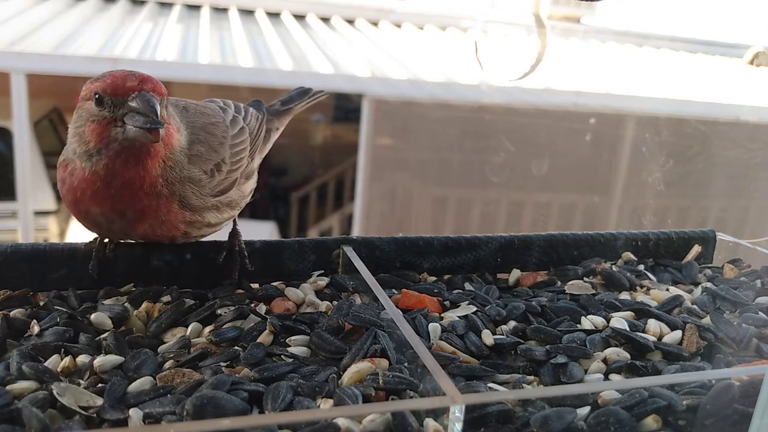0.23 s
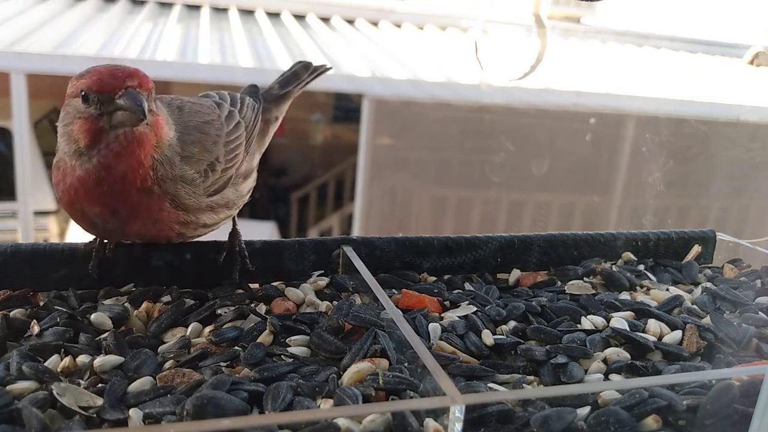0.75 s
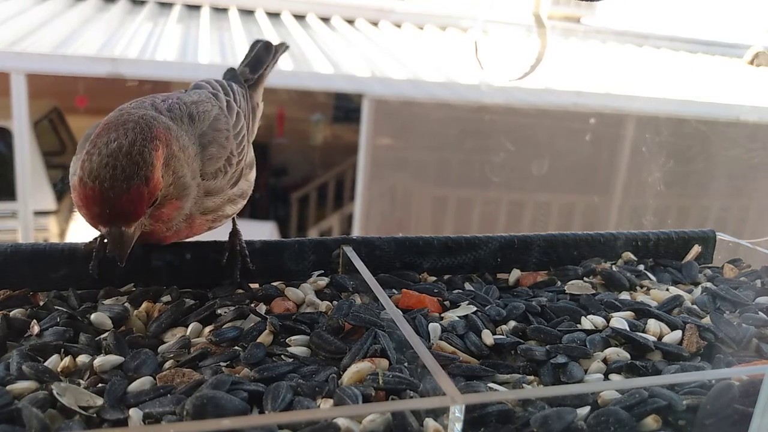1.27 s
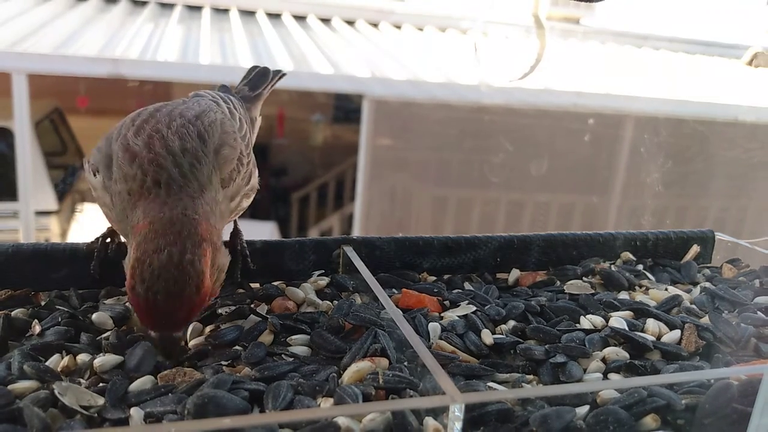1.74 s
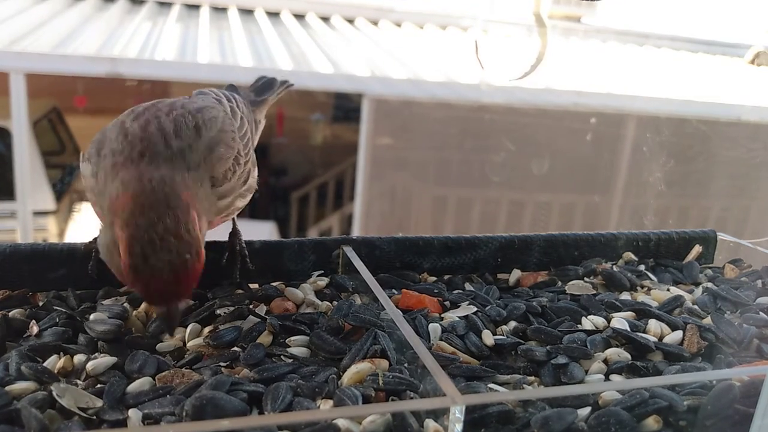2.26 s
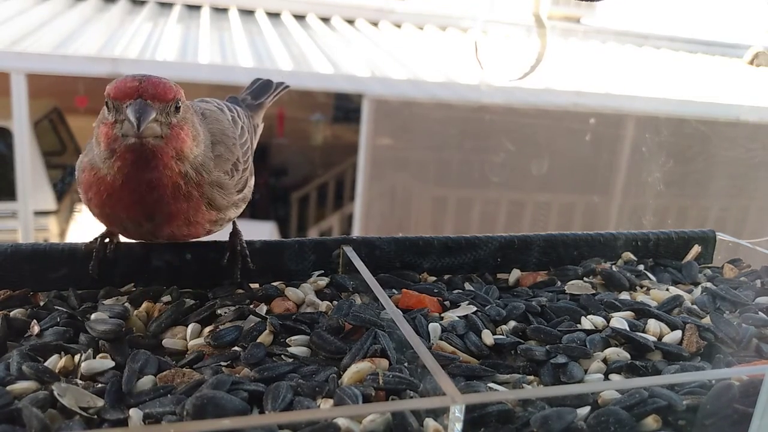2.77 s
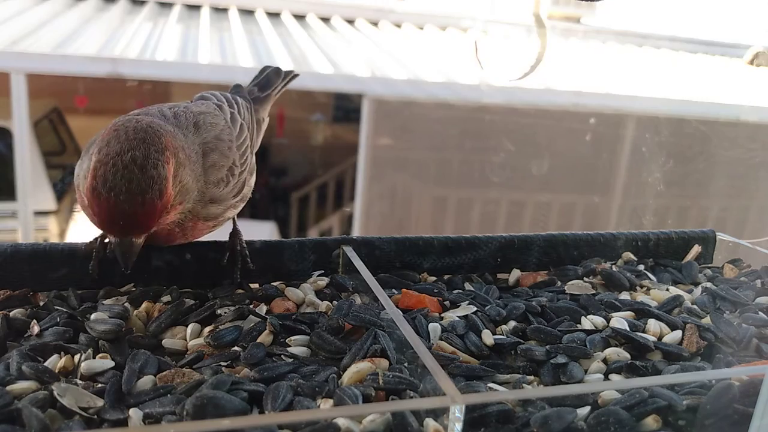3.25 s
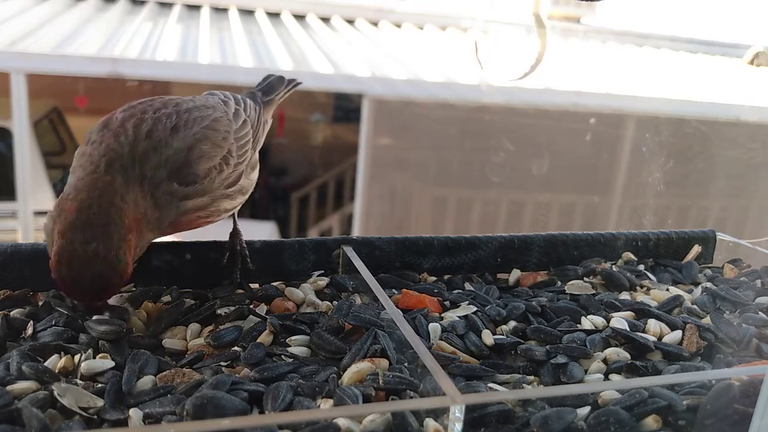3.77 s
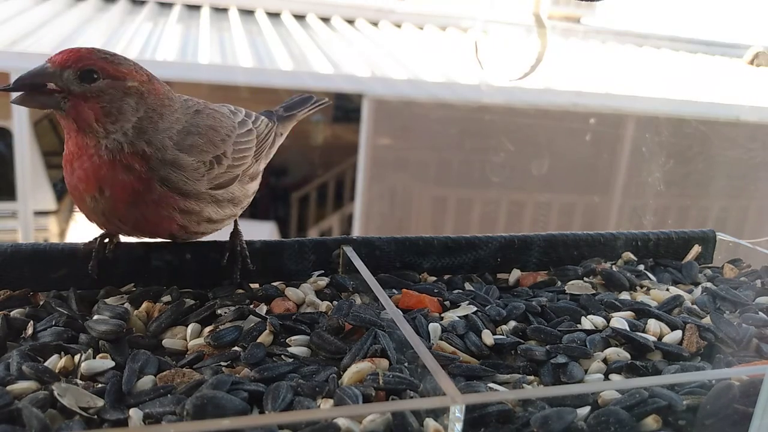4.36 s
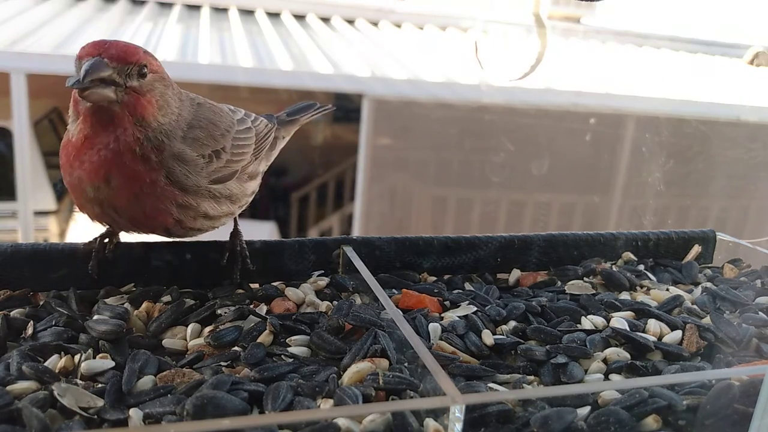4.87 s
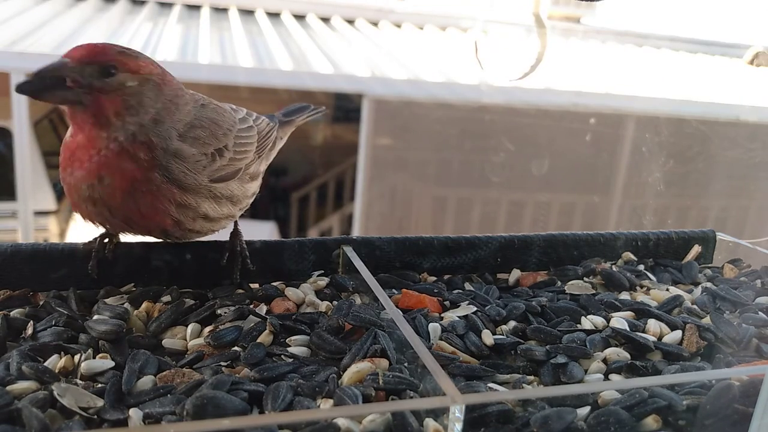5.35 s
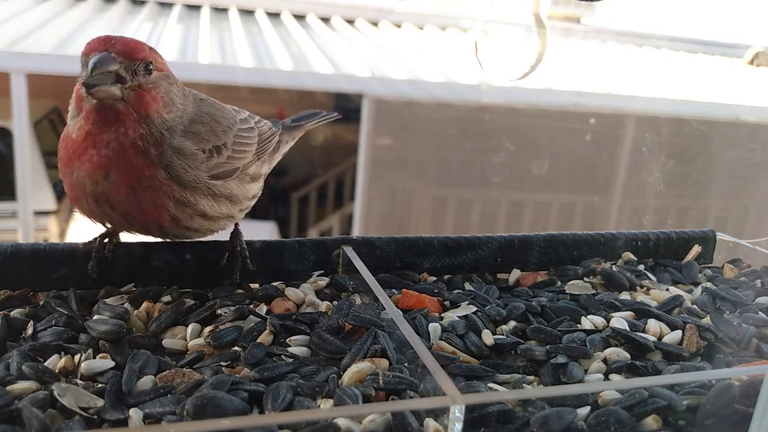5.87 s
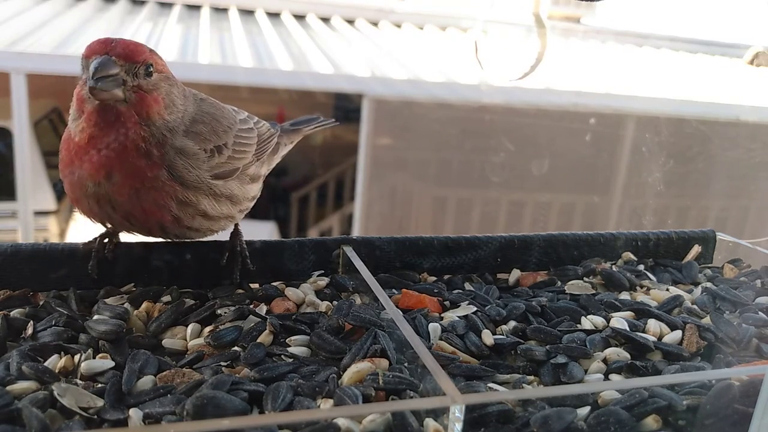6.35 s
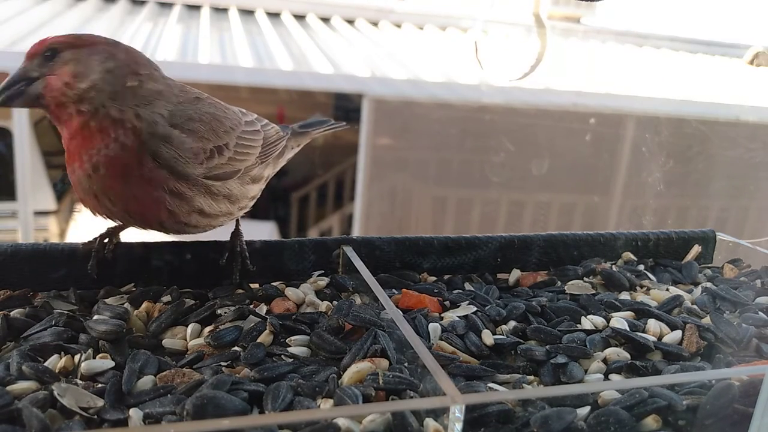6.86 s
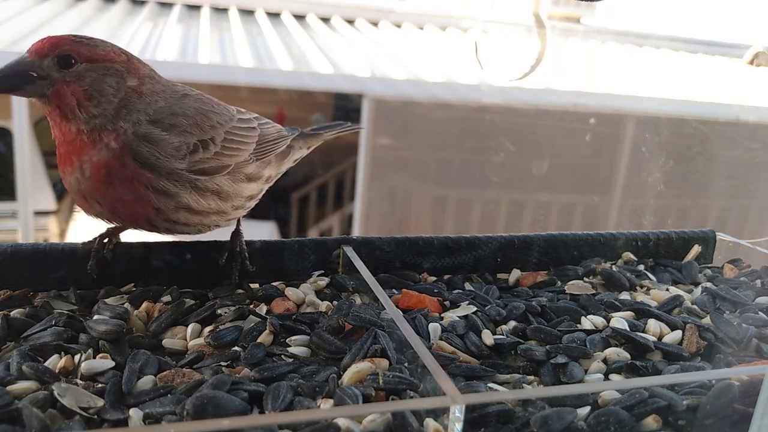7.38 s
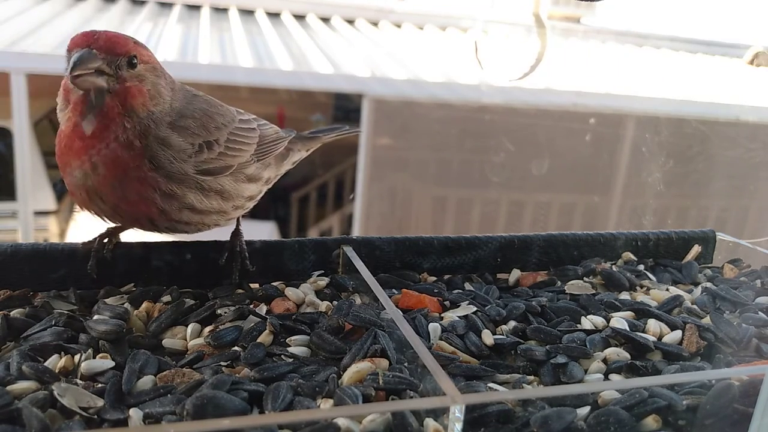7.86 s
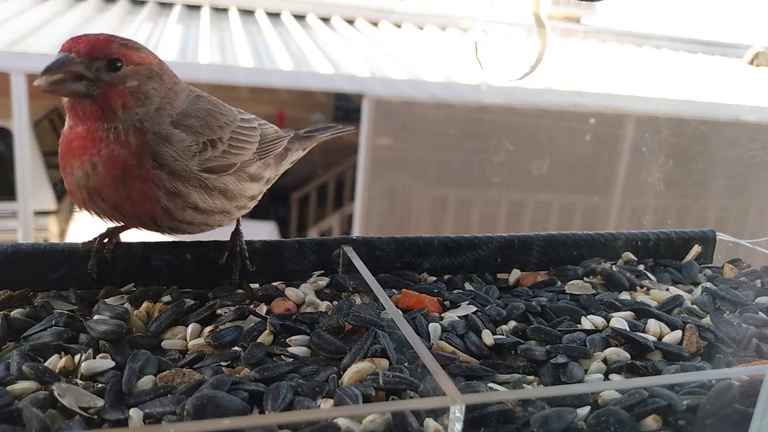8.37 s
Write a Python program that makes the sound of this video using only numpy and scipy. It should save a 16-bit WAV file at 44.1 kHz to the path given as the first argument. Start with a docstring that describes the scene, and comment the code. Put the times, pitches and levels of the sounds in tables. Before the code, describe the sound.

A steady, soft low rumble of far traffic with light hiss lasts all 8.6 seconds, slightly fuller midway, with thin wavering hums buried in it. Distant sparrow cheeps and short gliding whistles around 3 to 5 kHz come and go, blurred and echoed by house walls, a clearer one at 1.3. Up close and dry, a few faint ticks occur in the first second. At 1.75 a peck knocks the plastic tray and rustles seeds; small taps follow at 2.4 and 2.7, then a quieter spell until a knock at 3.8. From 4.1 light husk clicks patter. A very sharp bright crack snaps at 4.7, a moderate one at 5.75, then a dense loud cluster at 6.2 to 6.4, with single snaps at 6.9 and 7.13. Fine crumbling continues, a soft low thud comes at 7.8, and weak clicks at 8.0 and 8.4.

```python
"""On a plastic tray feeder among house walls, a finch husks seeds close to a small microphone.
Husks crack as short bursts that ring seed tones; knocks ring the tray; stirred seeds rustle
as showers of tiny clicks. Far birds whistle on gliding pitches, smeared by the walls, over
town rumble made of coloured noise, with two thin wavering hums."""
import sys
import numpy as np
from scipy import signal
from scipy.fft import rfft, irfft, next_fast_len
from scipy.io import wavfile

SR = 44100
rng = np.random.default_rng(int(sys.argv[2]) if len(sys.argv) > 2 else 0)


def transcribe(signal):
    """Save signal, clipped to [-1, 1], as a 16-bit WAV file at the path in sys.argv[1]."""
    frames = np.atleast_2d(signal).T
    limited = np.clip(frames, -1, 1)
    pcm = np.round(limited * 32767).astype(np.int16)
    wavfile.write(sys.argv[1], SR, pcm)


N = 380141
TIME = np.arange(N) / SR

# husk cracks and seed clicks that stand out; brightness is upper against lower drive energy:
# start_s [s], level_db [dB, relative], brightness_db [dB]
HUSK_CRACKS = [(0.3765, -34, -15), (0.3862, -37, -11), (0.6586, -27.5, 4.5), (0.906, -50, -8),
               (1.7543, -30.5, -26), (1.8009, -44, -1), (1.8405, -45, -4), (1.8817, -44, -8),
               (1.9309, -41, -6), (2.0168, -35, -8), (2.0337, -33.5, -4), (2.4863, -42, 0.0),
               (2.6946, -36, 3), (2.698, -27, -3), (3.834, -36, -2), (3.8841, -40.5, -8), (4.0959, -35, -6),
               (4.1015, -32.5, -8), (4.115, -34, -4), (4.202, -31, -7), (4.2253, -41, -6),
               (4.2665, -33, -5), (4.4937, -43, -5), (4.549, -43.5, 4), (4.708, -4.5, 10),
               (4.792, -33.5, 6.5), (4.8192, -37, -2), (4.8883, -43, -3), (5.1023, -43, -6),
               (5.1225, -42, -1), (5.175, -43, -2), (5.188, -39, -7), (5.261, -42, -5), (5.3258, -44, -3),
               (5.336, -44, -5), (5.3995, -33, -6), (5.4049, -34, -10), (5.464, -42, -4), (5.493, -36.5, 3),
               (5.5523, -44, -6), (5.635, -41, 18), (5.7159, -37, -1), (5.7579, -20, 3), (5.8563, -33, -7),
               (5.8652, -23, 1), (5.929, -40.5, -16), (5.9826, -39.5, 14), (6.1573, -36, -5),
               (6.184, -13, 12), (6.1883, -16.5, -2), (6.2144, -34, 15), (6.2178, -5, 14), (6.2272, -7, 15),
               (6.241, -39, -8), (6.311, -41, -3), (6.3226, -20.5, 10), (6.3477, -16, 4), (6.355, -14, 9),
               (6.3857, -39, 5), (6.4055, -31, 3), (6.4468, -33.5, -4), (6.5149, -40, 14),
               (6.562, -40.5, 7), (6.6876, -39.5, 4), (6.7723, -35.5, 9), (6.7792, -32.5, 4),
               (6.8808, -15, 4), (6.9368, -35.5, -4), (7.1348, -10.5, 4.5), (7.1417, -23, -4),
               (7.1957, -38.5, -10), (7.2519, -30.5, -2.5), (7.472, -42, 2), (7.5283, -43, 2),
               (7.5856, -42, 2), (7.9929, -26.5, -1.5), (8.4013, -36, 7)]
# tones a cracked seed rings with, and the time each takes to fall 60 dB:
# pitch_hz [Hz], level_db [dB, relative], t60_s [s]
SEED_TONES = [(3390, -18, 0.004), (4460, -6.5, 0.0057), (5126, 0.0, 0.0016), (6394, -2.5, 0.0034),
              (7920, -2, 0.0045), (8870, -7, 0.0032), (9850, -5.5, 0.0046), (12200, 0.0, 0.0025),
              (14970, -5.5, 0.0035), (16440, -18, 0.0013)]
SNAP_DB, CRUMBLE_S_PER_DB = -32, .00005   # cracks fainter than this crumble longer
TRAY_ANSWER_DB = -31   # base level of the tray's answer, before each crack's own level and dullness
HUSK_LOW_HZ = 2300   # cracks carry little sound below this


def cracks():
    """Bright cracks drive the upper seed tones, dull ones the lower; the tray answers faintly."""
    start_s, level_db, bright_db = np.transpose(HUSK_CRACKS)
    upper_share = 1 / (1 + amp(-2 * bright_db))[:, None]
    is_upper = np.array(SEED_TONES)[:, 0] > 9300
    energy_share = np.where(is_upper, upper_share, 1 - upper_share)
    contact_s = np.maximum(SNAP_DB - level_db, 0)[:, None] * CRUMBLE_S_PER_DB
    seed_gains = amp(level_db)[:, None] * np.sqrt(energy_share)
    husk = strike(start_s - .0004, seed_gains, SEED_TONES, contact_s, spread_db=1.5)
    # dull and soft cracks pass on a larger share to the tray; its lowest tone stays out
    tray_db = .6 * level_db + TRAY_ANSWER_DB - .5 * bright_db
    tray_gains = amp(tray_db)[:, None] * np.ones(3)
    tray = strike(start_s, tray_gains, TRAY_TONES[1:], 0, spread_db=2.5)
    high_pass = signal.butter(2, HUSK_LOW_HZ, "high", fs=SR, output="sos")
    husk = signal.sosfilt(high_pass, husk)
    near = husk + 1.2 * later(husk, .00057)   # the bounce off the tray
    treble = np.diff(husk, prepend=0)   # near walls return mostly treble
    return near + tray + amp(-14) * scatter(treble, t60=.035, delay_s=.001)


# knocks carried through the tray, long ones are scrabbling clusters:
# start_s [s], level_db [dB, relative], contact_s [s], lowest_tone_db [dB, added to the lowest tray tone]
TRAY_KNOCKS = [(1.741, -30, .022, -4), (1.7534, -20, 0.012, -4), (1.799, -34, 0.014, -3),
               (1.845, -40, .022, -6), (2.386, -31, 0.022, -4), (2.694, -27, .008, -5),
               (3.82, -29, 0.02, -4), (7.1416, -33, 0, 16)]
# tones of the plastic tray: pitch_hz [Hz], level_db [dB, relative], t60_s [s, time to fall 60 dB]
TRAY_TONES = [(1754, -6.5, 0.033), (2310, -8, 0.013), (2820, -13.5, 0.014), (3750, -12, .008)]
THUD_S, THUD_HZ, THUD_DB, THUD_LENGTH_S = 7.77, 61.5, -21, .045   # one low bump through the feeder


def knocks():
    """Blows ring the tray and the seeds lying on it; one soft low thud is a brief swelling sine."""
    start_s, level_db, contact_s, lowest_db = np.transpose(TRAY_KNOCKS)
    lying_seeds = [(hz, db - 6, t60) for hz, db, t60 in SEED_TONES[:4]]
    tones = list(TRAY_TONES) + lying_seeds
    is_lowest = np.arange(len(tones)) == 0
    gains = amp(level_db[:, None] + np.outer(lowest_db, is_lowest))
    tray = strike(start_s, gains, tones, contact_s[:, None], spread_db=2.5)
    t = np.clip(TIME - THUD_S, 0, THUD_LENGTH_S)
    swell = np.sin(np.pi * t / THUD_LENGTH_S)
    return tray - amp(THUD_DB) * swell * np.sin(2 * np.pi * THUD_HZ * t)


# beak and feet stirring seeds: start_s [s], length_s [s], level_db [dB, relative]
SEED_STIRS = [(0.572, 0.073, -60.5), (1.249, 0.063, -63), (1.734, 0.054, -47.5), (2.378, .03, -57.5),
              (2.955, 0.054, -62), (3.065, 0.13, -66), (7.428, 0.055, -59)]
# loudness curve of crumbs nibbled and seeds tumbling between cracks: time_s [s], level_db [dB, relative]
CRUMB_LEVELS = [(1.7, -85), (1.82, -66), (2.6, -78), (3.7, -90), (3.95, -67), (5.0, -77), (5.35, -68),
                (6.5, -63), (8.1, -69)]


def rustle():
    """Stirs are dense tiny clicks ringing seeds and tray; crumbs are sparser, more uneven clicks."""
    stir = 0
    for start_s, length_s, db in SEED_STIRS:
        swell = np.sin(np.pi * np.clip((TIME - start_s) / length_s, 0, 1))
        stir = stir + amp(db) * np.sqrt(swell ** 2)
    dense = grains(2500, spread_db=-0.5, clump_db=0.5)
    sparse = grains(200, spread_db=4.0, clump_db=8.0)
    # stirred seeds ring shorter, with their tones nearer in level
    seeds = sum(amp(db / 3) * ring(dense, hz, t60 * 0.32) for hz, db, t60 in SEED_TONES)
    tray = sum(amp(db) * ring(dense * stir, hz, t60) for hz, db, t60 in TRAY_TONES)
    crumbs = 0
    for hz, db, t60 in SEED_TONES:
        uneven = amp(db + 6.9 * rng.standard_normal(N))   # so each crumb has its own colour
        crumbs = crumbs + ring(sparse * uneven, hz, t60)
    crumbs = crumbs + .35 * scatter(crumbs, t60=.025, delay_s=0)
    return stir * rms_one(seeds) + amp(-20) * tray + level(CRUMB_LEVELS) * rms_one(crumbs)


# a sparrow's arched cheeps: start_s [s], top_pitch_hz [Hz], level_db [dB, relative],
# closing_fall [share of the top pitch]
SPARROW_CHEEPS = [(0.505, 5150, -61, 0.1), (1.314, 5200, -54, 0.25), (2.656, 5150, -59.5, 0.1),
                  (3.843, 5250, -63.5, 0.05), (4.512, 5250, -64.5, 0.1), (5.556, 5200, -63, 0.03),
                  (6.525, 5200, -61, 0.03), (7.043, 5300, -62.5, 0.1), (7.978, 5280, -60.5, 0.03)]
# a cheep starts low, leaps to the top, holds, drops late
CHEEP_S, RISE_SHARE, RISE_S, FALL_POWER = .05, .25, .0043, 7.0
OFF_TOP_DB = -30   # change of level per share of pitch below the top
ECHO_S, ECHO_DB, CHEEP_WALLS_DB = .062, -9, -7


def sparrow(warble):
    """Arched whistles, each doubled at its onset by a brief, fainter, higher voice, with one clear echo."""
    cheeps = onsets = 0
    for start_s, top_hz, db, fall in SPARROW_CHEEPS:
        t = np.clip(TIME - start_s, 0, CHEEP_S)
        below = RISE_SHARE * np.exp(-t / RISE_S) + fall * (t / CHEEP_S) ** FALL_POWER
        pitch_hz = (1 - below) * top_hz + 40 * warble
        cheeps = cheeps + whistle(start_s, CHEEP_S, pitch_hz, db + OFF_TOP_DB * below)
        onsets = onsets + whistle(start_s, .016, 1.06 * top_hz + 40 * warble, db - 13)
    direct = cheeps + onsets + amp(ECHO_DB) * later(cheeps, ECHO_S)
    return direct, amp(CHEEP_WALLS_DB) * cheeps


# clearer gliding notes of birds far off:
# start_s [s], length_s [s], start_pitch_hz [Hz], end_pitch_hz [Hz], level_db [dB, relative]
GLIDING_NOTES = [(0.497, 0.06, 3800, 3900, -63), (0.664, 0.027, 4200, 2280, -51),
                 (0.87, .09, 4100, 2900, -63), (1.16, .06, 3700, 3000, -64), (1.283, 0.12, 3700, 3500, -63),
                 (1.41, .05, 3300, 4800, -62), (2.6, .06, 3700, 3000, -63), (2.74, .1, 3100, 4100, -62),
                 (3.084, 0.034, 4180, 2140, -57), (3.86, .16, 3750, 4000, -63), (4.3, 0.2, 3450, 3400, -63),
                 (4.43, .1, 3050, 3000, -62), (4.695, 0.16, 2850, 2884, -61), (4.81, 0.26, 3750, 3900, -62),
                 (5.01, 0.077, 3250, 3250, -58), (5.236, 0.13, 3380, 3380, -59),
                 (5.249, .2, 4010, 3900, -63), (6.6, 0.11, 3400, 4000, -63.5), (6.89, .06, 4300, 3000, -62),
                 (8.044, 0.094, 3400, 4430, -63), (8.46, 0.07, 3800, 2800, -62)]
CLEAR_DB, BLUR_PER_DB, WARBLE_HZ = -46, .036, 330   # fainter notes are farther off and more blurred


def gliding_notes(warble):
    """Whistles slide between two pitches; blurred ones warble widely and come more from the walls."""
    direct = walls = 0
    for start_s, length_s, start_hz, end_hz, db in GLIDING_NOTES:
        blur = np.clip((CLEAR_DB - db) * BLUR_PER_DB, 0, 1)
        glide = start_hz + (end_hz - start_hz) * (TIME - start_s) / length_s
        note = whistle(start_s, length_s, glide + WARBLE_HZ * blur ** 2 * warble, db)
        direct = direct + (1 - blur) * note
        walls = walls + blur * note
    return direct, walls


# loudness curve of the blurred chatter of many birds: time_s [s], level_db [dB, relative, each singer]
CHATTER_LEVELS = [(0.0, -84), (.6, -75), (1.46, -75), (2.11, -88), (2.82, -70), (3.5, -77), (4.0, -67),
                  (4.6, -67), (4.9, -73), (5.3, -67), (6.1, -80), (6.52, -72), (7.76, -83), (8.17, -74)]
CHATTER_HZ, CHATTER_SWING_HZ, CHATTER_NOTES_PER_S, CHATTER_DIRECT = 3450, 480, 12, .4


def chatter():
    """Five unseen singers roam in pitch, their notes switched on and off by chance."""
    direct = walls = 0
    for _ in range(5):
        singing = np.clip(wander(CHATTER_NOTES_PER_S, .2), 0, 1)
        pitch_hz = CHATTER_HZ + CHATTER_SWING_HZ * wander(9.0, .15)
        note = level(CHATTER_LEVELS) * singing * sine(pitch_hz)
        direct = direct + CHATTER_DIRECT * note
        walls = walls + note
    return direct, walls


def far_birds():
    """Calls arrive both direct and smeared by many reflections from house walls."""
    warble = wander(40.0, 0.05)
    birds = [sparrow(warble), gliding_notes(warble), chatter()]
    direct = sum(bird[0] for bird in birds)
    walls = sum(bird[1] for bird in birds)
    return direct + scatter(walls, t60=0.5, delay_s=.01)


# colour of the town noise: pitch_hz [Hz], level_db [dB per Hz, relative]
TOWN_COLOUR = [(24, -33.5), (40, -4), (87, 0), (396, -10), (878, -11), (1370, -41), (1760, -30.5),
               (1950, -42.5), (2440, -43.5), (3630, -46.5), (5690, -53.5), (15400, -58.5)]
TOWN_DB = -39


def town():
    """Steady far traffic and hiss: random noise coloured by the microphone's housing."""
    hz, db = np.transpose(TOWN_COLOUR)
    size = next_fast_len(N)
    bin_hz = np.arange(size // 2 + 1) * SR / size
    colour = amp(np.interp(np.log(bin_hz + 0.0011), np.log(hz), db))
    rumble = irfft(rfft(rng.standard_normal(size)) * colour, size)[:N]
    swell = amp(2 * np.sin(np.pi * TIME / TIME[-1]))   # traffic is a little louder midway
    return amp(TOWN_DB) * swell * rms_one(rumble)


# loudness curve of the wavering hum: time_s [s], level_db [dB]
HUM_LEVELS = [(0.0, -56), (1.25, -57), (2.44, -48), (3.02, -56), (4.12, -46), (5.08, -56), (6.73, -51),
              (8.6, -58)]
HUM_HZ, HUM_WAVER_HZ = 533, 1.5
LOW_HUM_S, LOW_HUM_LENGTH_S, LOW_HUM_HZ, LOW_HUM_DB = 2.3, 2.1, 243, -48   # swells once


def hums():
    """Two thin sine tones come and go in the rumble, their pitch wavering together."""
    low_swell = np.sin(np.pi * np.clip((TIME - LOW_HUM_S) / LOW_HUM_LENGTH_S, 0, 1))
    waver = HUM_WAVER_HZ * wander(1.5, .8)
    hum = level(HUM_LEVELS) * sine(HUM_HZ + waver)
    return hum + amp(LOW_HUM_DB) * low_swell * sine(LOW_HUM_HZ + waver)


def strike(times, gains, modes, contact_s, spread_db):
    """Each blow is a splintering burst of unit energy; it drives every tone with a strength of its own."""
    steps = np.arange(1000)
    at = (np.asarray(times) * SR).astype(int)[:, None] + steps
    window = np.sin(np.pi * np.clip((steps + 1) / (contact_s * SR + 2), 0, 1))
    bursts = rng.choice([-1, 1], at.shape) * window
    bursts /= np.sqrt(np.sum(bursts ** 2, axis=1, keepdims=True))
    chance = amp(spread_db * rng.standard_normal(gains.shape))
    out = np.zeros(N)
    for k, (hz, db, t60) in enumerate(modes):
        push = np.zeros(N)
        np.add.at(push, at, bursts * (gains * chance)[:, k, None])
        out += (-1) ** k * amp(db) * ring(push, hz, t60)   # tones alternate in sign
    return out


def ring(push, hz, t60):
    """A unit click sets a dying sine of starting height about 1 ringing."""
    r, w = amp(-60 / (t60 * SR)), 2 * np.pi * hz / SR
    return signal.lfilter([0, np.sin(w)], [1, -2 * r * np.cos(w), r * r], push + 1e-18)


def grains(per_s, spread_db, clump_db):
    """Random clicks of uneven size that come in clumps, rms 1."""
    sizes = amp(spread_db * np.minimum(rng.exponential(1, N), 4)) * rng.choice([-1, 1], N)
    clumps = amp(clump_db * wander(14, .15))
    return rms_one(sizes * (rng.random(N) < clumps * per_s / SR))


def whistle(s, length, hz, db):
    """A near sine on a pitch track, with soft ends."""
    on = slice(int(s * SR), int((s + length) * SR))
    loudness = (amp(db) * np.ones(N))[on]
    soft_ends = np.abs(np.sin(np.pi * (TIME[on] - s) / length)) ** 0.24
    out = np.zeros(N)
    out[on] = loudness * soft_ends * sine(hz[on])
    return out


def sine(hz):
    """A tone of rms 1 that follows a pitch."""
    return np.sqrt(2) * np.sin(2 * np.pi * np.cumsum(hz) / SR)


def wander(hz, t60):
    """Chance swinging at about this rate, rms 1: noise through a ringing filter."""
    return rms_one(ring(rng.standard_normal(N), hz, t60))


def scatter(x, t60, delay_s):
    """Many close reflections: convolution with dying noise of unit energy."""
    t = np.arange(int(SR / 2)) / SR
    tail = rng.standard_normal(len(t)) * amp(-60 * t / t60) * (t > delay_s)
    return signal.fftconvolve(x, tail / np.sqrt(np.sum(tail ** 2)))[:N]


def later(x, delay_s):
    """The sound delayed; its end wraps round to the start."""
    return np.roll(x, int(delay_s * SR))


def level(rows):
    """Gain in time from (s, dB) rows."""
    return amp(np.interp(TIME, *np.transpose(rows)))


def rms_one(x):
    """Scale to rms 1."""
    return x / np.sqrt(np.mean(x ** 2) + 1e-20)


def amp(db):
    """dB to gain."""
    return 10 ** (np.asarray(db) / 20)


def scene():
    """Everything at one microphone."""
    return (cracks() + knocks() + rustle() + far_birds() + town() + hums())[None]


CUTOFF_HZ = 17330   # from here up the treble is at least 70 dB down


def record(dry):
    """The microphone loses the deep bass; the top is cut."""
    thin = signal.sosfilt(signal.butter(2, 45, "high", fs=SR, output="sos"), dry)
    return signal.sosfilt(signal.cheby2(12, 70, CUTOFF_HZ, fs=SR, output="sos"), thin)


dry = scene()
out = record(dry)
transcribe(out)
```